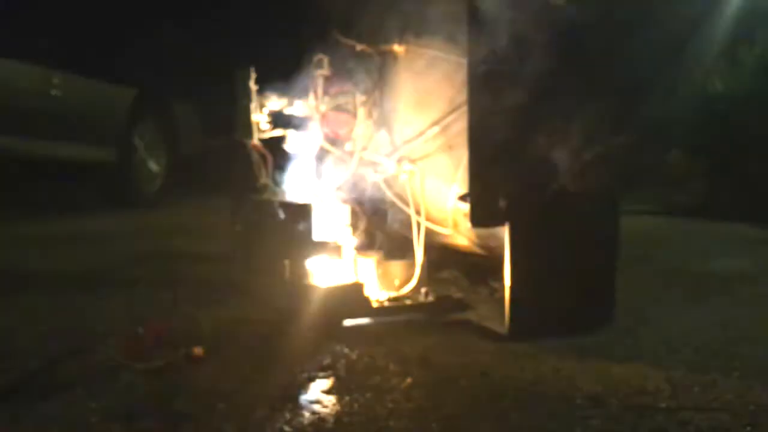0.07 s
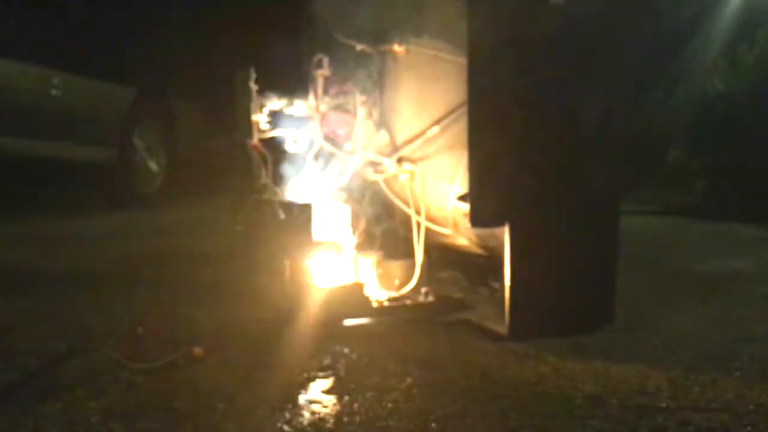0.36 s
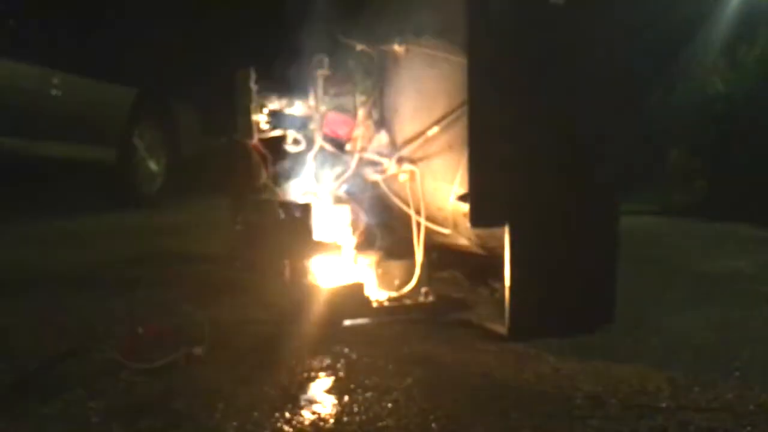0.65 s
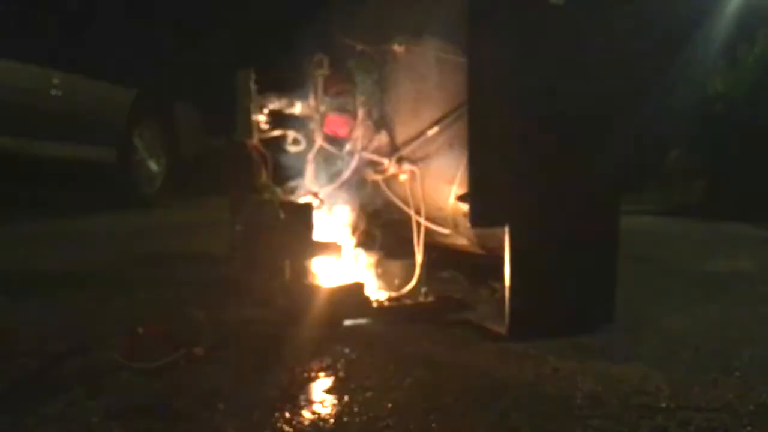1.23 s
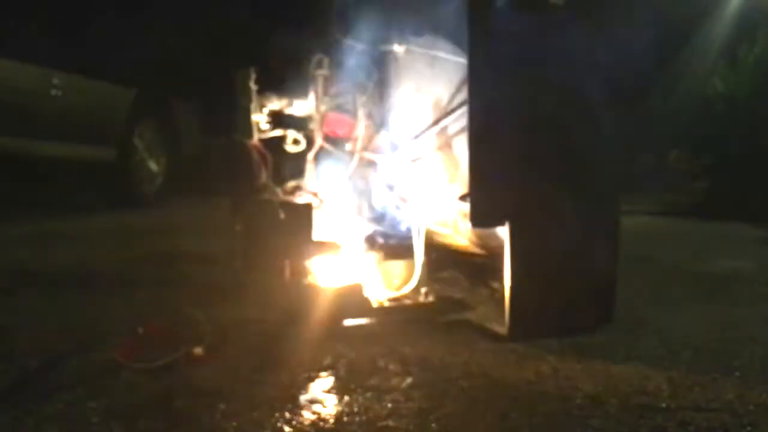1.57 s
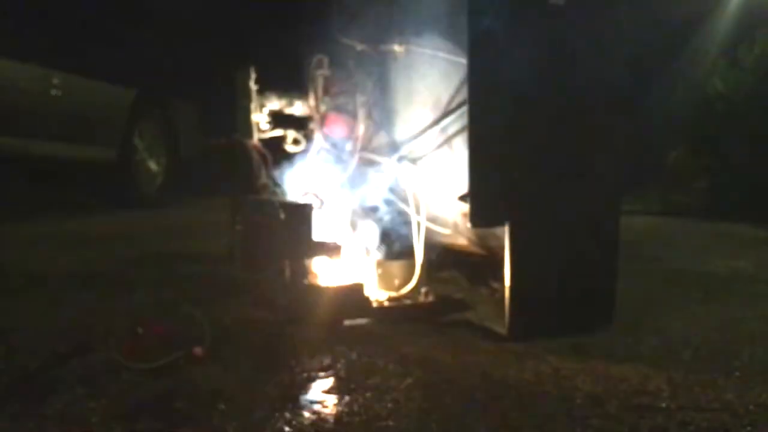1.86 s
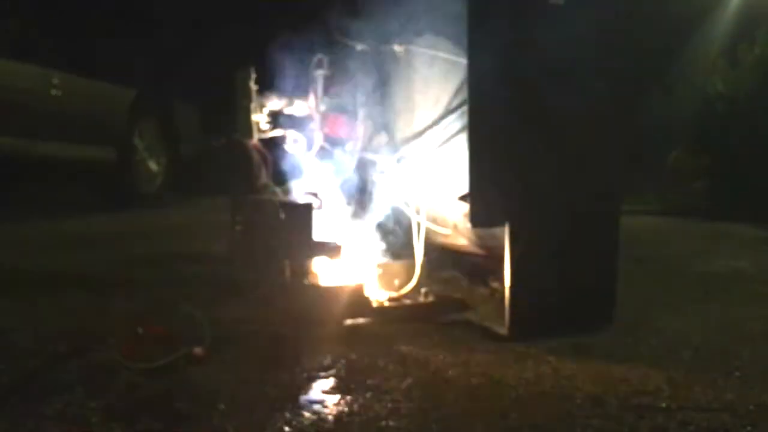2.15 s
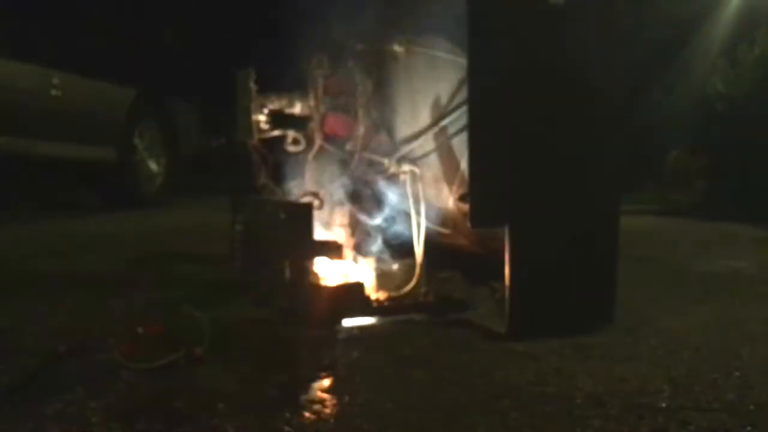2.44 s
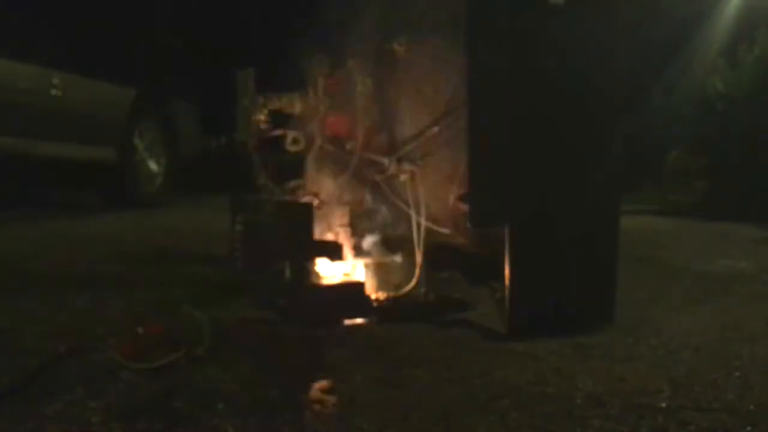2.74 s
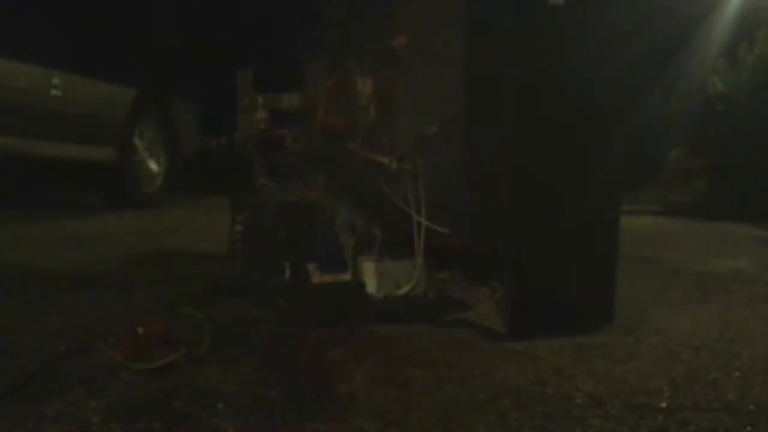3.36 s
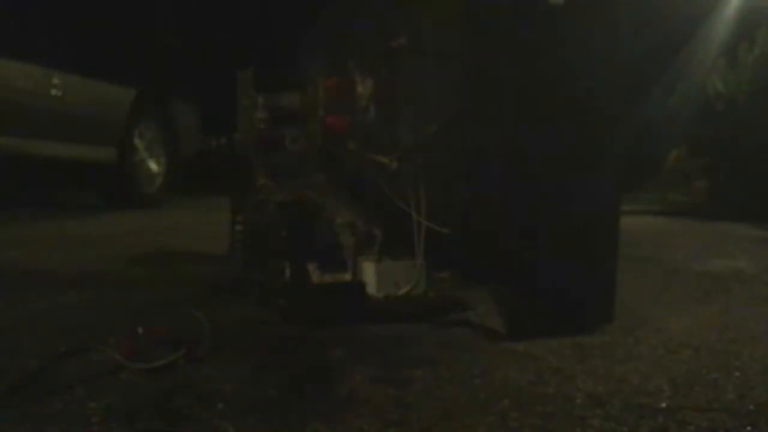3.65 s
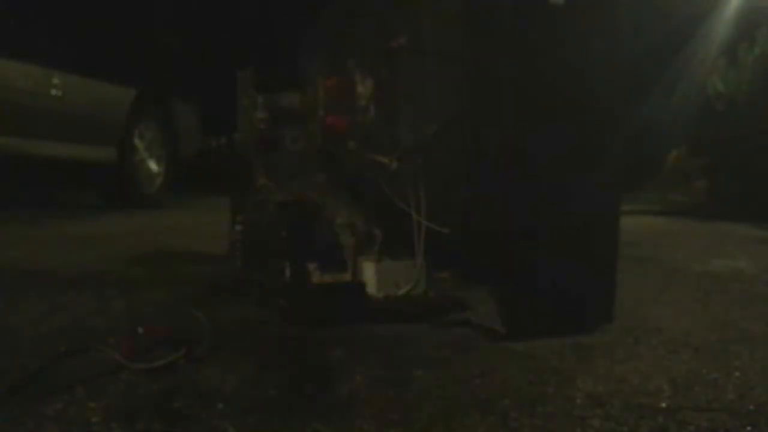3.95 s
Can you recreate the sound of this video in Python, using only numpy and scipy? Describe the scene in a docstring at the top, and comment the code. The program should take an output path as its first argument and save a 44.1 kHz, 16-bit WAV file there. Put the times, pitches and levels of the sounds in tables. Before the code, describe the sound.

Harsh buzz and sizzle of an electric arc, spitting sparks until it abruptly cuts out.

```python
"""An electric arc burns through a circuit board on a metal cabinet, outdoors at night.
It strikes once per mains cycle: a burst of sizzle and a push of hot air, together a harsh buzz.
Molten metal spits, and the cabinet's ring shifts as the arc leaps up it. After a last snap, a faint
fizz, small pops, cooling ticks and a dull puff remain over the flutter of flame and night air."""
import sys
import numpy as np
from scipy import signal
from scipy.fft import rfft, irfft
from scipy.io import wavfile

SR = 44100
rng = np.random.default_rng(int(sys.argv[2]) if len(sys.argv) > 2 else 0)


def transcribe(signal):
    """Save signal, clipped to [-1, 1], as a 16-bit WAV file at the path in sys.argv[1]."""
    frames = np.atleast_2d(signal).T
    limited = np.clip(frames, -1, 1)
    pcm = np.round(limited * 32767).astype(np.int16)
    wavfile.write(sys.argv[1], SR, pcm)


N = 176400
T = np.arange(N) / SR
MAINS_HZ, MODE_WIDTH_HZ = 60, 110
BURN_S, RING_S, RING_DB = 0.0069, 0.0068, -3.5   # one burn and the cabinet's after-ring
LEAP_S, LEAP_LENGTH_S, ARC_END_S = 1.473, 0.22, 2.895
# tone of the arc in front of the cabinet: (frequency [Hz], level [dB])
ARC_COLOUR = [(260, -39.5), (450, -13.5), (522, -20), (615, -1), (854, -6.5), (962, 2), (1040, -5.5),
              (1300, 1.5), (1570, -9), (2350, -6.5), (2470, -12), (2980, -19), (3330, -10.5), (3900, -15),
              (4350, -11), (4880, -18.5), (5300, -15), (8600, -11), (10000, -10.5), (10500, -18.5),
              (11000, -10.5), (15800, -19.5)]


def from_db(db):
    """Decibels to gain."""
    return 10 ** (np.asarray(db) / 20)


def rms_one(x):
    """Scale to an rms of 1."""
    return x / np.sqrt(np.mean(x ** 2) + 1e-20)


def colour(x, points):
    """Minimum-phase EQ through points of (frequency [Hz], gain [dB])."""
    size = 8192
    hz, db = np.transpose(points)
    grid_hz = np.maximum(np.arange(size // 2 + 1) * SR / size, 1)
    gain = from_db(np.interp(np.log(grid_hz), np.log(hz), db))
    cepstrum = irfft(np.log(gain))
    cepstrum[1:size // 2] *= 2
    cepstrum[size // 2 + 1:] = 0
    return signal.fftconvolve(x, irfft(np.exp(rfft(cepstrum))))[:N]


def band(x, low_hz, high_hz):
    """Band-pass."""
    return signal.sosfilt(signal.butter(3, [low_hz, high_hz], "band", fs=SR, output="sos"), x)


def resonance(x, hz, width_hz=MODE_WIDTH_HZ):
    """One resonance with unity gain at its peak."""
    return signal.lfilter(*signal.iirpeak(hz, hz / width_hz, fs=SR), x)


def grainy_noise(grain_db=2, grains_per_s=2500):
    """Noise whose level jumps with each tiny spark."""
    sparks = np.clip(rng.standard_normal(N), -2, 2)
    return rng.standard_normal(N) * from_db(grain_db * sparks[(T * grains_per_s).astype(int)])


def clicks(times, gains):
    """One impulse at each time."""
    return np.bincount(np.clip(np.asarray(times) * SR, 0, N - 1).astype(int), gains, N)


def bursts(times, db, burn_s=BURN_S, ring_s=RING_S):
    """Envelope of burns, each a half sine with an after-ring; db is the level over one mains cycle."""
    t = T[:SR // 10]
    burn = np.sin(np.pi * np.minimum(t / burn_s, 1)) ** 2
    ring = np.convolve(burn, np.exp(-2 * t / ring_s))[:len(t)]
    power = burn / burn.sum() + from_db(RING_DB) ** 2 * ring / ring.sum()
    power *= SR / MAINS_HZ / power.sum()
    power_train = signal.fftconvolve(clicks(times, from_db(db) ** 2), power)[:N]
    return np.sqrt(np.maximum(power_train, 0))


def decays(times, db, decay_s):
    """Envelope of hard attacks with exponential tails."""
    return signal.lfilter([1], [1, -np.exp(-1 / (decay_s * SR))], clicks(times, from_db(db)) + 1e-18)


def pushes(times, db, points):
    """Pulses of air with a given tone; db is the level over one mains cycle."""
    pulse = colour(clicks([0], [1]), points)
    steady_rms = np.sqrt(np.sum(pulse ** 2) * MAINS_HZ / SR)
    return colour(clicks(times, from_db(db)), points) / steady_rms


def scatter(times, spread_db):
    """A random level offset for each strike."""
    return spread_db * rng.standard_normal(len(times))


def buzz(strikes, vigour_db):
    """Each burn heats the air and gives one low push, which rattles the cabinet's panels."""
    # strength of the buzz: (time [s], level [dB])
    strength = [(0.0, -13.5), (0.21, -16.5), (0.3, -15), (0.34, -13), (0.365, -18), (0.78, -19),
                (0.88, -15.5), (0.98, -21), (1.28, -19.5), (1.5, -19), (1.55, -12), (1.62, -13),
                (1.73, -22.5), (1.98, -22), (2.11, -17.5), (2.15, -22.5), (2.23, -18), (2.43, -15.5),
                (2.52, -21), (2.67, -18.5), (2.7, -18), (2.75, -17.5), (2.8, -23), (2.87, -22.5)]
    # tone of one push of air: (frequency [Hz], level [dB])
    push_colour = [(20, -79), (60, 0.5), (120, 4.5), (180, 3.5), (240, 1.5), (300, -5.5), (365, -6),
                   (440, -35.5), (540, -31.5), (1200, -91.5)]
    # boost or cut of the hum at the mains pitch: (time [s], gain [dB])
    hum_ride = [(0.35, 0.5), (0.72, -7), (0.95, 0.5), (2.35, 1), (2.62, -18)]
    # panel rattle: (low edge [Hz], high edge [Hz], level against the buzz [dB], ring [s])
    panel = (233.5, 392, -13, 17)
    low_hz, high_hz, panel_db, ring_s = panel
    spread_db = 1.32 * strikes - 0.46   # more uneven as the board burns away
    db = np.interp(strikes, *np.transpose(strength)) + vigour_db + scatter(strikes, spread_db)
    push_times = strikes + 0.00345   # mid-burn
    rattle = rms_one(band(rng.standard_normal(N), low_hz, high_hz))
    rattle *= bursts(push_times, db + panel_db, ring_s=ring_s)   # each ring is cut off at 0.1 s
    push = pushes(push_times, db, push_colour)
    hum = resonance(push, MAINS_HZ, width_hz=MAINS_HZ / 2)
    hum_gain = from_db(np.interp(T, *np.transpose(hum_ride)))
    return push + (hum_gain - 1) * hum + rattle


def sizzle(strikes, vigour_db):
    """Each burn is a burst of sparks, a little different in tone every time; the mids light first."""
    # band levels before trim: (time [s], mids [dB], upper mids [dB], treble [dB])
    band_rides = [(0.0, -21, -21, -24), (0.3, -19, -21, -20.5), (0.55, -23.5, -23, -22.5),
                  (0.74, -23.5, -21.5, -21.5), (0.768, -26, -24, -22.5), (0.79, -28.5, -30.5, -32),
                  (0.825, -19.5, -23.5, -18.5), (1.0, -27, -21.5, -20.5), (1.251, -24.5, -23.5, -21.5),
                  (1.42, -24.5, -17.5, -17.5), (1.58, -22.5, -16.5, -19.5), (1.75, -27, -24, -22),
                  (1.9, -24, -20, -21), (2.4, -21.5, -22, -22.5), (2.6, -24, -28, -29.5),
                  (2.75, -21, -24.5, -26.5), (2.8, -29, -31.5, -29), (2.87, -29.5, -27, -28)]
    # spark bands: (low edge [Hz], high edge [Hz], trim [dB], burn-to-burn scatter [dB])
    bands = [(470, 2230, -0.58, 1.06), (2190, 6100, -7, 1.64), (6440, 16600, -6, 0.83)]
    times, *levels = np.transpose(band_rides)
    leads_s = (0.0013, 0, 0)
    out = 0
    for level, (low_hz, high_hz, trim_db, spread_db), lead_s in zip(levels, bands, leads_s):
        db = np.interp(strikes, times, level) + trim_db + vigour_db + scatter(strikes, spread_db)
        sparks = grainy_noise()
        steady_rms = np.std(band(colour(sparks, ARC_COLOUR), low_hz, high_hz))
        burns = colour(sparks * bursts(strikes - lead_s, db), ARC_COLOUR)
        out += band(burns, low_hz, high_hz) / steady_rms
    return out


def ring_modes(x, modes, wander_db=1, wander_per_s=7.73):
    """Narrow resonances in parallel, each swelling and fading as the arc dances."""
    out = 0
    for hz, db in modes:
        steps = rng.standard_normal(100)
        wander = np.interp(T * wander_per_s, np.arange(len(steps)), steps)
        out += from_db(db + wander_db * wander) * resonance(x, hz)
    return out


def cabinet(x):
    """The metal rings; some resonances give way to others as the arc leaps up the cabinet."""
    # resonances wherever the arc burns: (frequency [Hz], gain [dB])
    body_modes = [(2730, 4.5), (3622, 5), (4100, -1.5), (4530, -1.5), (9720, -8), (11320, -9)]
    # resonances with the arc low on the board: (frequency [Hz], gain [dB])
    low_modes = [(1776, -10), (2142, -7.5), (2562, -18), (3176, 2), (6352, 2.5), (8064, 3.5), (9216, -7)]
    # resonances with the arc high on the cabinet: (frequency [Hz], gain [dB])
    high_modes = [(5630, 5), (6115, -2.5), (6729, -2.5), (8494, -4)]
    leap = np.clip((T - LEAP_S) / LEAP_LENGTH_S, 0, 1)
    body = ring_modes(x, body_modes)
    low = (1 - leap) * ring_modes(x, low_modes)
    high = leap * (T < ARC_END_S) * ring_modes(x, high_modes)
    return x + body + low + high


def air():
    """A low, fluttering bed of flame and night air."""
    # tone of the bed: (frequency [Hz], level [dB])
    air_colour = [(15, 5), (25, -13), (75, 7), (121, 0), (191, -12.5), (363, -10.5), (450, -27), (900, -23),
                  (1110, -13.5), (1390, -26), (9520, -31), (15000, -40)]
    return from_db(-33) * rms_one(colour(rng.standard_normal(N), air_colour))


def spits(burn_s=0.0047):
    """Molten metal spits in violent burns: a crack with a bright edge and a thump of air."""
    # spits before trim: (time [s], crack level [dB], edge level [dB])
    hits = [(0.319, -18.5, -32), (0.385, -17, -15), (0.653, -10, -39), (0.852, -34, -11), (0.869, -10, -15),
            (0.902, -9, -25), (0.986, -21, -18), (1.102, -22.5, -14), (1.169, -9, -16),
            (1.22, -21.5, -19.5), (1.319, -16.5, -19), (1.569, -10.5, -26), (1.586, -11, -38),
            (1.601, -17, -21), (1.702, -12, -14), (1.77, -14, -42), (1.852, -14, -38), (2.152, -18.5, -26),
            (2.219, -15.5, -34), (2.288, -17.5, -39), (2.302, -14, -37), (2.419, -17.5, -38),
            (2.503, -20, -19), (2.737, -17.5, -22), (2.886, -16.5, -16)]
    # tone of the crack: (frequency [Hz], level [dB])
    crack_colour = [(250, -46), (430, -4.5), (520, -8), (680, 2), (1350, 6.5), (1650, -2.5), (3500, -11),
                    (9000, -27)]
    # tone of the thump: (frequency [Hz], level [dB])
    thump_colour = [(60, -33), (150, 10.5), (260, 3.5), (380, 7.5), (520, -23.5), (1000, -14.5)]
    times, crack_db, edge_db = np.transpose(hits)
    crack = rms_one(colour(rng.standard_normal(N), crack_colour))
    crack *= bursts(times, crack_db - 3.5, burn_s, ring_s=0.01)
    edge = rms_one(band(colour(grainy_noise(), ARC_COLOUR), 4000, 15200))
    edge *= bursts(times, edge_db - 7, burn_s)
    thump = pushes(times + 0.0033, 1.76 * crack_db, thump_colour)   # grows faster than the crack
    return crack + edge + thump


def whistle(sparks):
    """For short spells the sizzle drives one high resonance."""
    # whistling spells: (start [s], end [s], drive [dB])
    spells = [(0.656, 0.73, 11), (1.302, 1.443, 10)]
    drive = sum(from_db(db) * ((T > start_s) & (T < end_s)) for start_s, end_s, db in spells)
    return resonance(sparks * drive, hz=8040)


def glints(sparks, count=50, spread_s=0.353, swell_s=0.023, low_hz=2320, high_hz=13980):
    """Around the leap, short whistly resonances come and go in the sizzle at random pitches."""
    times = LEAP_S + LEAP_LENGTH_S + spread_s * rng.standard_normal(count)
    pitches_hz = low_hz * (high_hz / low_hz) ** rng.random(count)
    out = 0
    for time_s, hz in zip(times, pitches_hz):
        swell = np.exp(-((T - time_s) / swell_s) ** 2)
        out += resonance(sparks * swell + 1e-18, hz)
    return from_db(7) * out


def flare(strikes):
    """A few burns flare with a very bright hiss as the arc leaps."""
    # the flare: (start [s], end [s], level [dB])
    spell = (1.63, 1.73, -27)
    start_s, end_s, db = spell
    times = strikes[(strikes > start_s) & (strikes < end_s)]
    return rms_one(band(grainy_noise(), 9400, 17000)) * bursts(times, np.full(len(times), db))


def snap():
    """The arc breaks with one sharp crack."""
    crack = rms_one(colour(rng.standard_normal(N), ARC_COLOUR))
    return crack * decays(times=[2.8868], db=[-9], decay_s=0.002)


def fizz(strikes, lead_s=0.0006):
    """A weak arc lingers, sputtering unevenly at the mains rate."""
    # strength of the weak arc: (time [s], level [dB])
    strength = [(2.92, -46), (3.0, -40), (3.17, -34), (3.32, -41.5), (3.38, -35.5), (3.46, -44),
                (3.7, -42.5), (3.8, -47.5)]
    db = np.interp(strikes, *np.transpose(strength)) + scatter(strikes, spread_db=2)
    sparks = rms_one(colour(grainy_noise(grain_db=3.5), ARC_COLOUR))
    return sparks * bursts(strikes - lead_s, db, burn_s=0.0058, ring_s=0.015)


def pops():
    """The burning board gives small midrange pops."""
    # pops before trim: (time [s], peak level [dB])
    hits = [(3.102, -19), (3.49, -20.5)]
    times, db = np.transpose(hits)
    return rms_one(band(rng.standard_normal(N), 1220, 2520)) * decays(times, db - 5, decay_s=0.01)


def ticks():
    """The cooling board gives tiny bright cracks."""
    # ticks before trim: (time [s], peak level [dB])
    hits = [(3.2196, -20), (3.271, -20), (3.3546, -16.5), (3.37, -23), (3.436, -19), (3.5365, -23)]
    times, db = np.transpose(hits)
    return rms_one(band(rng.standard_normal(N), 1200, 12000)) * decays(times, db - 10, decay_s=0.0031)


def puff(time_s=3.6445):
    """The fire gives one dull puff: a short breath of noise on a push of air."""
    # tone of the puff: (frequency [Hz], level [dB])
    puff_colour = [(70, -32), (185, 7), (270, -8.5), (360, -1), (620, -10), (1600, -19), (3500, -37)]
    breath = rms_one(colour(rng.standard_normal(N), puff_colour))
    breath *= decays([time_s], db=[-17.5], decay_s=0.012)
    return breath + pushes([time_s], db=[-27], points=puff_colour)


def scene():
    """The mains times every strike, first of the full arc, then of the weak one."""
    strikes = np.arange(0, N / SR, 1 / MAINS_HZ) + 0.0015   # the arc lights just into each cycle
    strikes += 0.00024 * rng.standard_normal(len(strikes))   # timing jitter
    strong, weak = strikes[strikes < ARC_END_S], strikes[strikes >= ARC_END_S]
    vigour_db = scatter(strong, spread_db=1.5)   # moves sizzle and buzz together
    sparks = sizzle(strong, vigour_db)
    arc = cabinet(sparks + spits() + snap() + fizz(weak) + ticks())
    arc += buzz(strong, vigour_db) + whistle(sparks) + glints(sparks)
    fire = pops() + puff() + air()
    return (arc + fire + flare(strong))[None]


def record(dry, cutoff_hz=16000):
    """The loudest spits overload the microphone; a steep low-pass cuts the top."""
    clipped = np.clip(dry, -1, 1)
    return signal.sosfilt(signal.ellip(12, .2, 80, cutoff_hz, fs=SR, output="sos"), clipped)


dry = scene()
out = record(dry)
transcribe(out)
```